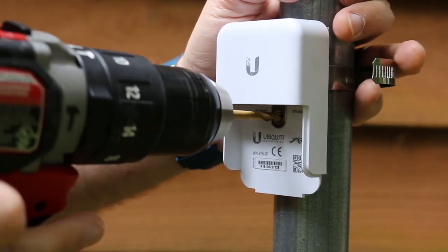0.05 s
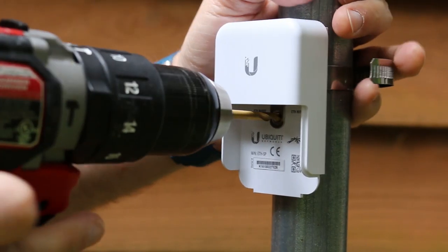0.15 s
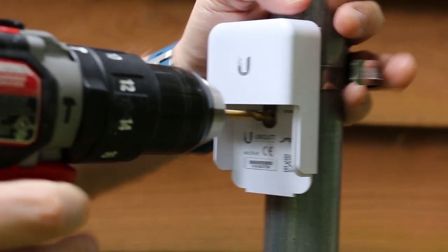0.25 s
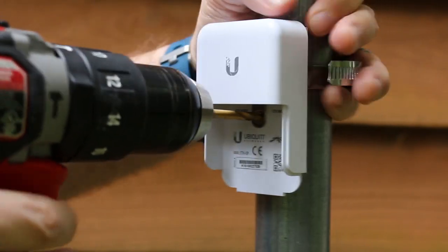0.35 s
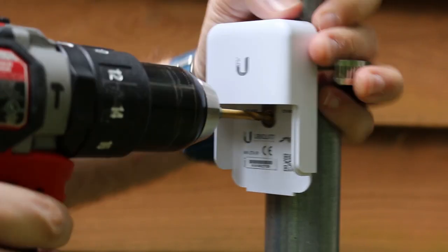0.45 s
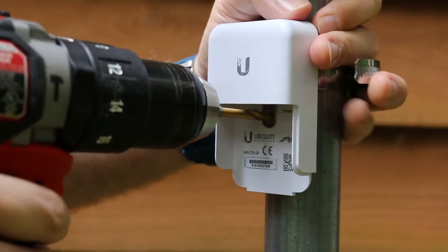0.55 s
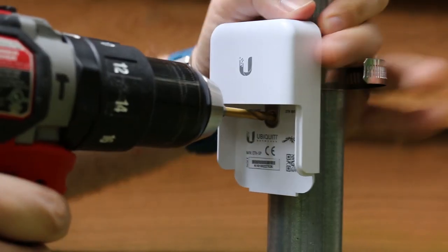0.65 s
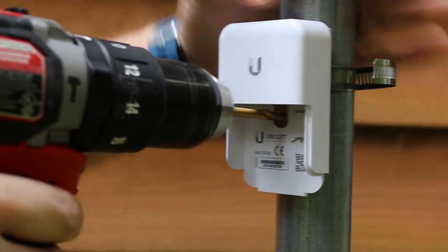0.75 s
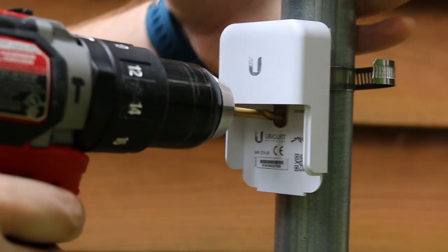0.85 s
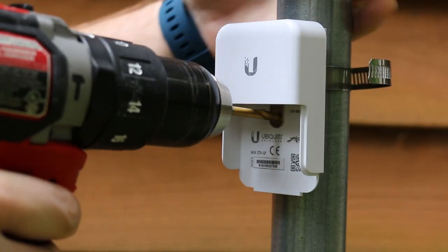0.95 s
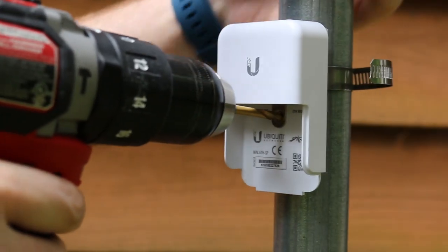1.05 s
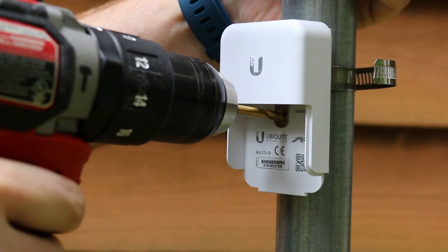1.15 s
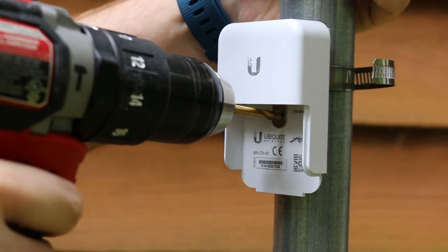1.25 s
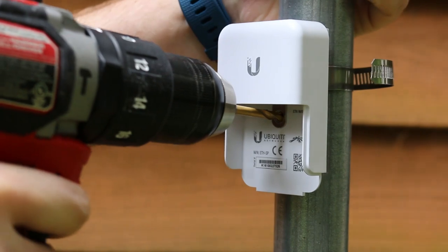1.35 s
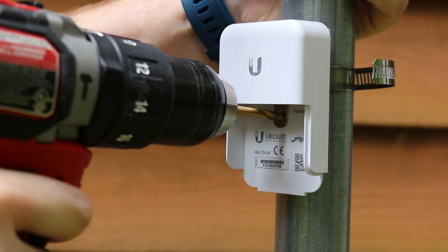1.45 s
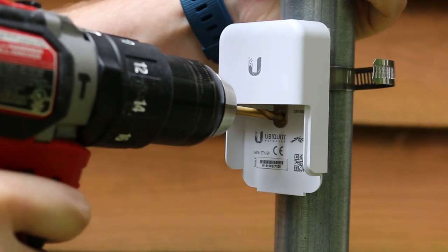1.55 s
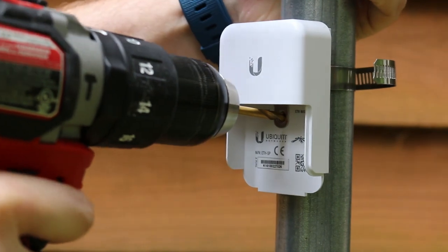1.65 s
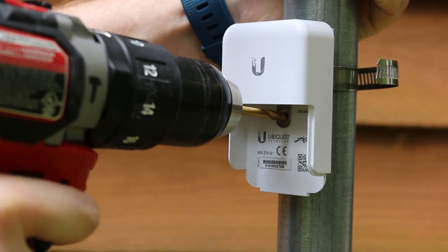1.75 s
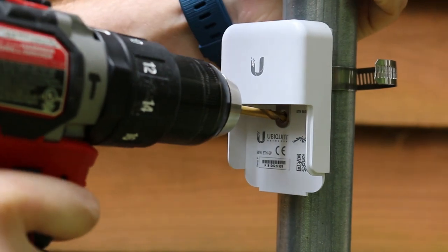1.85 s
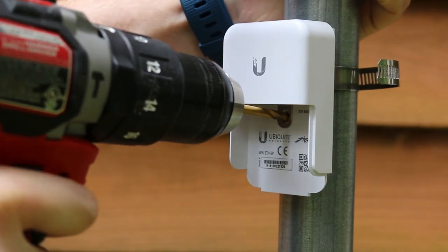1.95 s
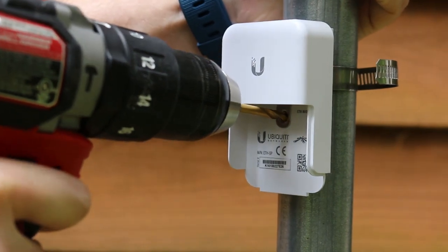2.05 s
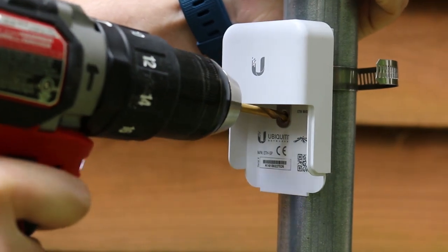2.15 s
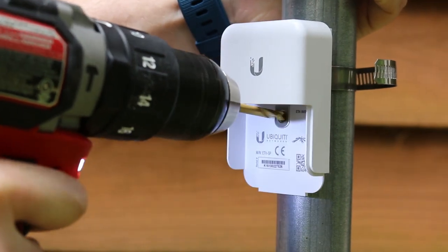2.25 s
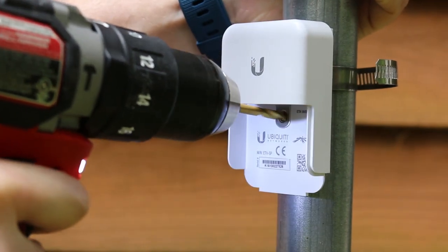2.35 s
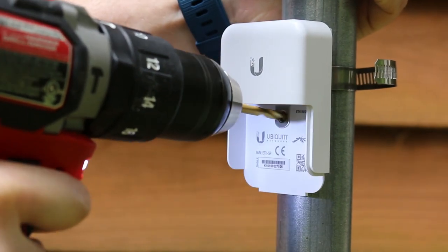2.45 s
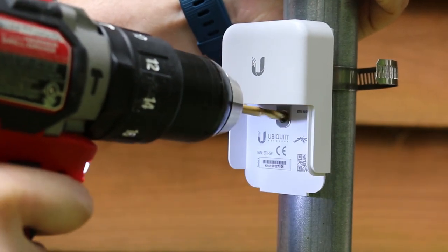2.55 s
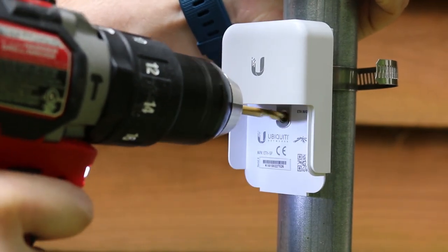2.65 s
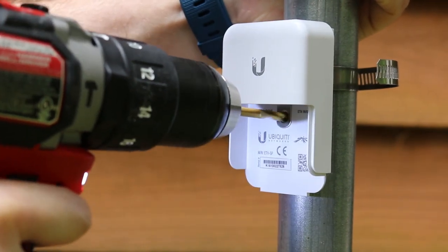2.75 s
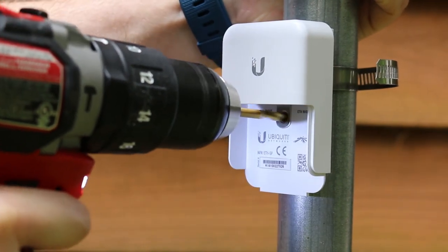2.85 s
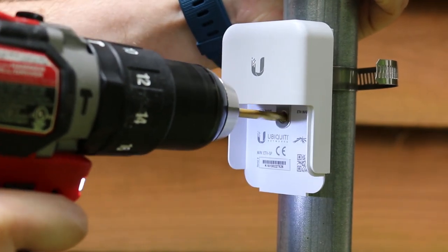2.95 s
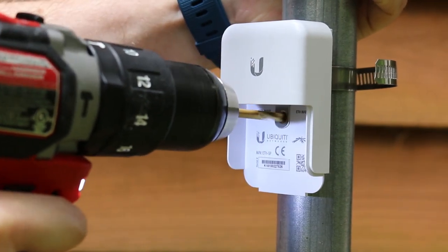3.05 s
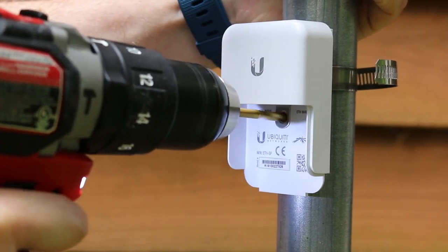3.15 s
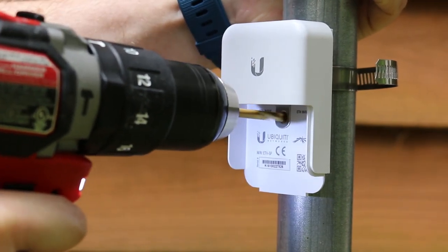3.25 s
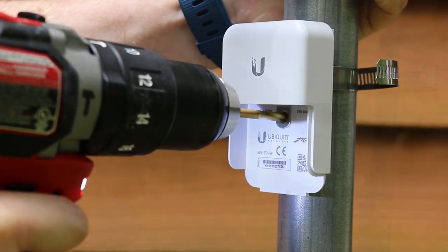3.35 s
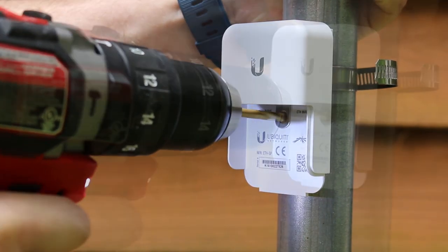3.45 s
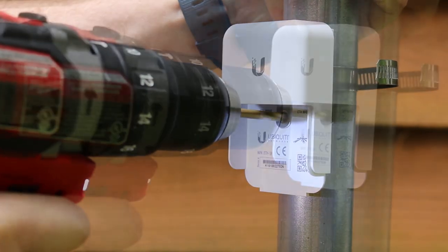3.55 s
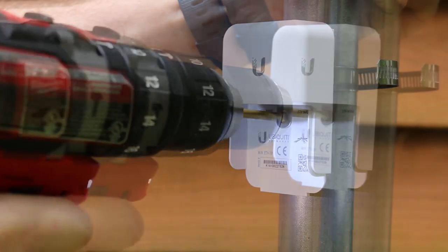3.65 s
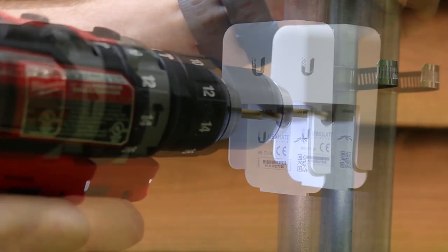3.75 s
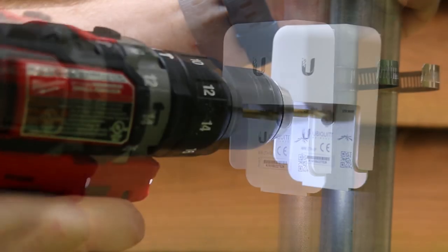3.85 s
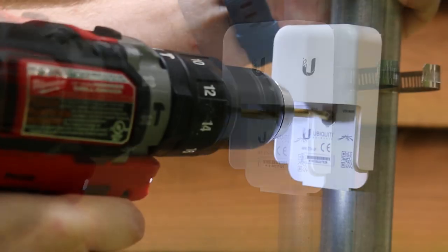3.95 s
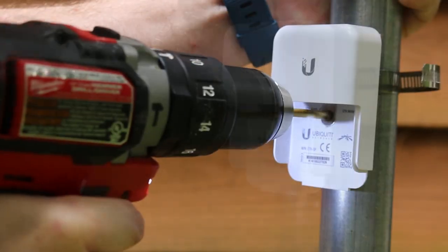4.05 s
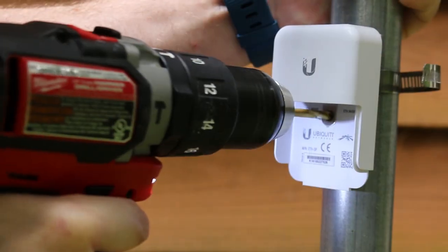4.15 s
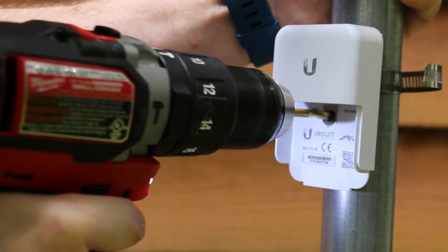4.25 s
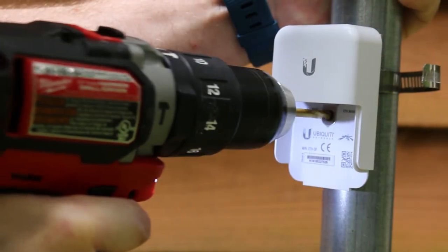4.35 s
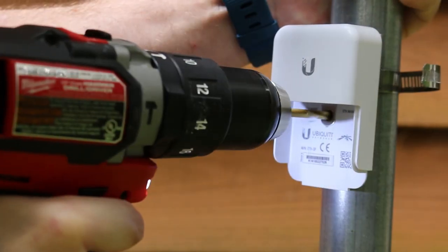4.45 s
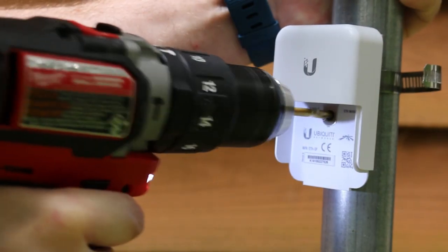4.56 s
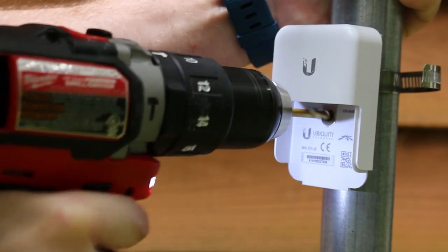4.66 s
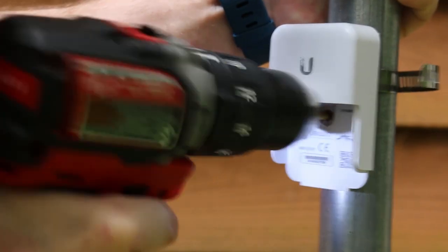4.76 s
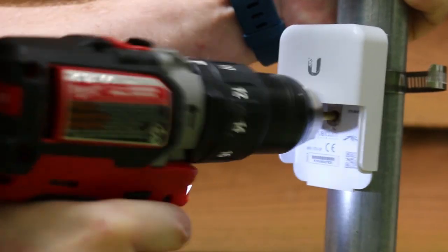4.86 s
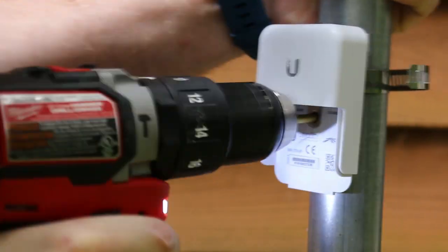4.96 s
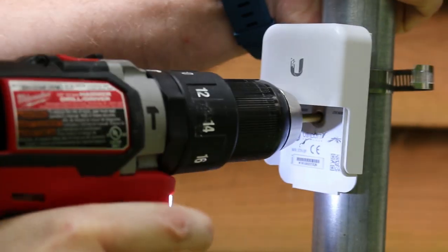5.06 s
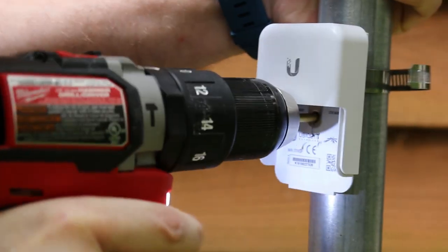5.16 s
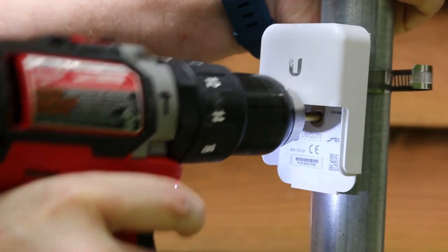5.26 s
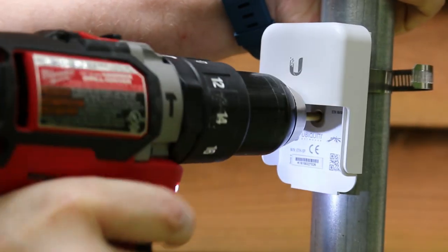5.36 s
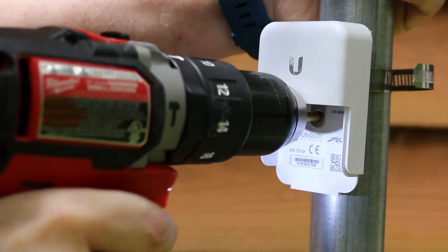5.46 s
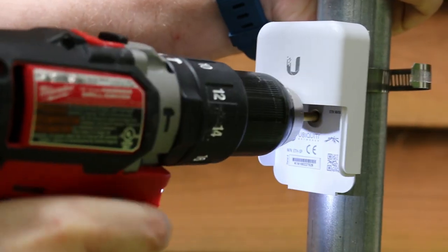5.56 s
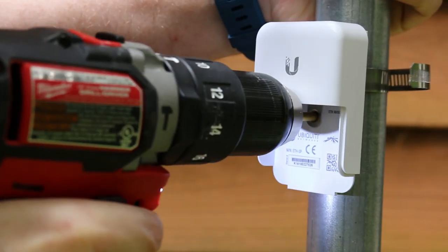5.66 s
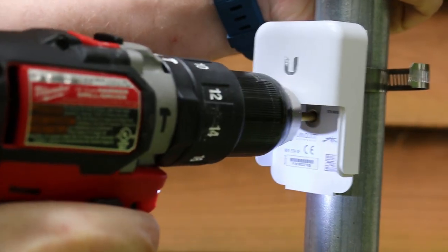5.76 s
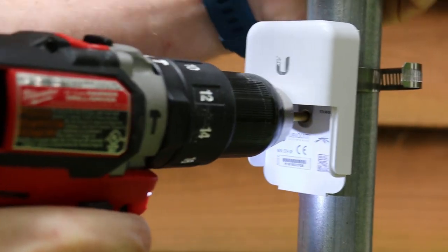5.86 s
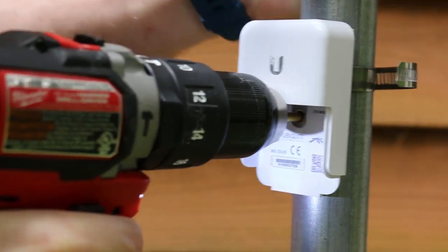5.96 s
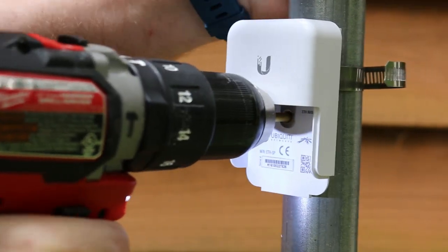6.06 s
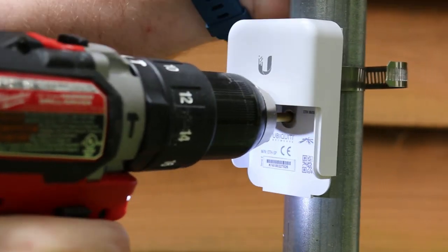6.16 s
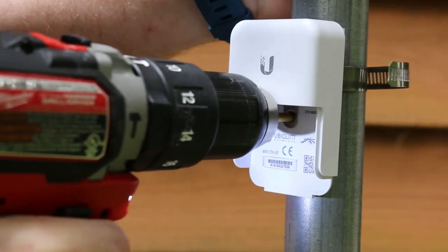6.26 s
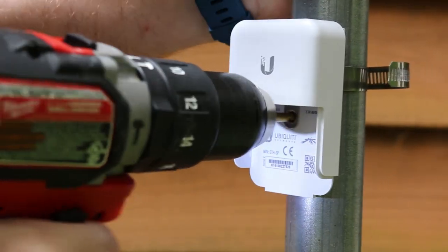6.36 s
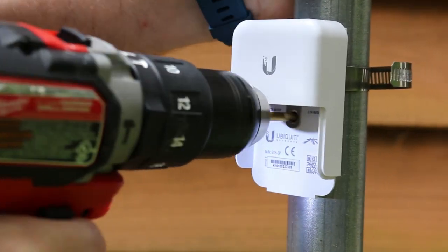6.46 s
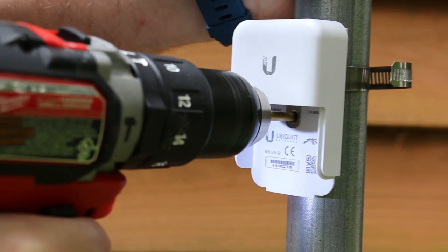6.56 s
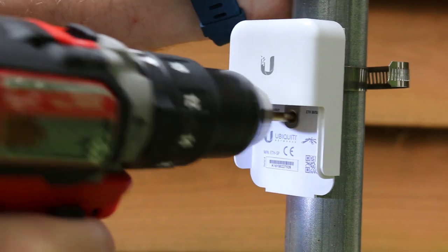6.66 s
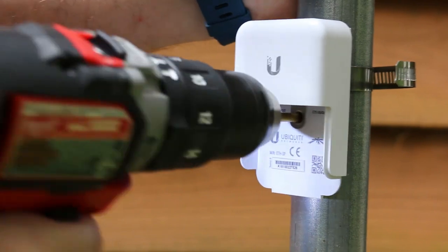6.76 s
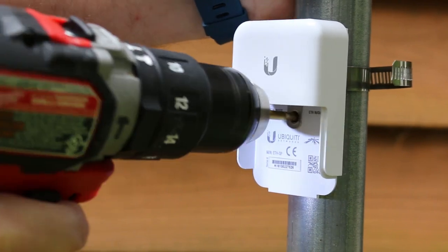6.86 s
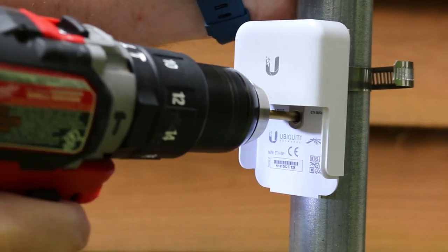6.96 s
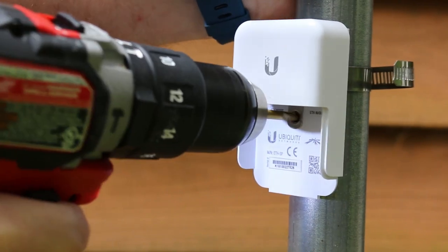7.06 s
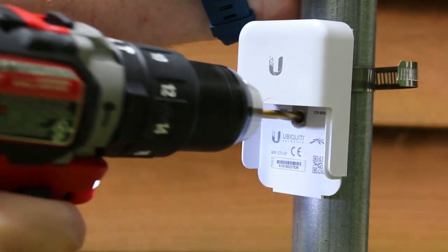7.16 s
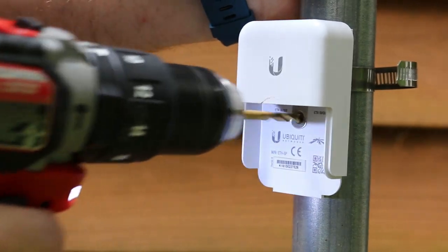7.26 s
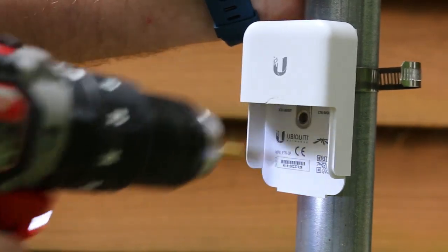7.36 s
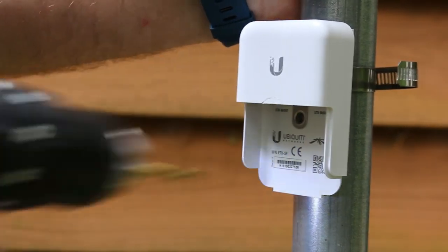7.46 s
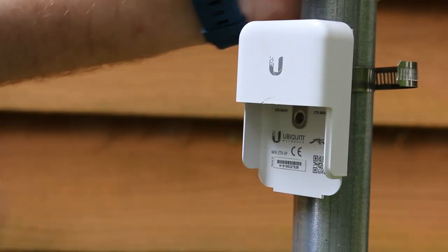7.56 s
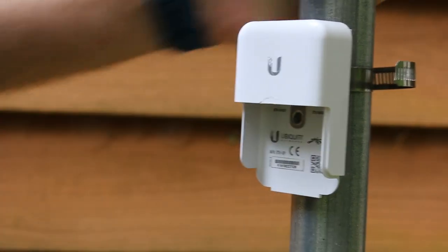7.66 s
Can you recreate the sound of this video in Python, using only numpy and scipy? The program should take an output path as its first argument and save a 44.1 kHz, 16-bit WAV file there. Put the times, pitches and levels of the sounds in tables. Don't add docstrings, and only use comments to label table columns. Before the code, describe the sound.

Outdoors, close and dry, over a faint low hum. From 0 to 0.6 s hands rub a steel pole with soft hiss, light taps and thin ringing; at about 0.87 s a hard, bright plastic snap hits, then rubbing fades into near quiet. At 2.3 s a trigger clicks and a cordless drill creeps up with chattering gears and a thin high whistle, surging near 2.8 s, dipping, then settling by 3 s into a loud steady whine with rasping steel and airy fan noise. From 3.8 s a low groan joins and pitch sags slightly. Around 4.75 s breakthrough brings clattering clicks and pole knocks; the motor brakes down by 5.1 s. Clicks at 5.25 and 5.4 s, a pole bump at 5.7 s and soft handling follow. At 6.37 s a click launches a quick second run, steady until 7.5 s, whining down by 7.6 s into a slight rub and quiet.

```python
import sys
import numpy as np
from scipy import signal
from scipy.io import wavfile
from scipy.ndimage import uniform_filter1d

SR = 44100
rng = np.random.default_rng(int(sys.argv[2]) if len(sys.argv) > 2 else 0)


def how_loud(loudness_db):
    steps = np.asarray(loudness_db, float) / 20
    return 10 ** steps


def transcribe(u):
    v = np.clip(np.atleast_2d(u).T, -1, 1)
    q = np.round(v * 32767).astype(np.int16)
    wavfile.write(sys.argv[1], SR, q)


N = 340452

# [f/Hz, level/dB per Hz]
HUM_COLOUR = [(20, -26), (100, -3), (130, -10), (500, -17), (1000, -30.5), (3000, -38), (9000, -59.5)]
# [t/s, pole ring/dB, housing ring/dB, skin hiss/dB, decay/dB per s]
HAND_STROKES = [(.01, -48, -64, -67, 36), (.15, -51.5, -71, -72, 30), (.33, -44, -56, -59.5, 90),
                (.42, -57, -66, -71, 108), (.57, -62, -71, -61.5, 301), (.83, -66, -73, -55.5, 81.5),
                (.9, -75, -48, -61, 53.5), (1.0, -72, -54, -60.5, 30), (1.19, -69, -56, -58.5, 38.5),
                (1.31, -73, -54.5, -63.5, 43), (1.55, -76, -63, -72.5, 48), (5.07, -58.5, -58.5, -68, 59),
                (5.2, -76, -64.5, -68.5, 19), (5.44, -80, -59, -67, 70), (5.62, -78, -62.5, -85, 25),
                (5.78, -66.5, -62, -86, 26.5), (6.1, -69.5, -67, -79.5, 13.5), (7.62, -66.5, -50, -65, 43)]
RESTING_DB = (-75, -86, -93)
# [f/Hz, level/dB, t60/s]
POLE_MODES = [(251, -29, 0.23), (355, 11, 0.16), (424, -23.5, 0.11), (1002, -2, 0.16), (1110, -2, 0.14),
              (1250, -29, 0.11)]
# [f/Hz, width/Hz, level/dB]
HOUSING_MODES = [(1420, 44, -3), (1980, 100, -6), (2460, 80, -6.5), (2580, 48, -6), (3037, 110, 0),
                 (3290, 150, -10.5), (3880, 75, -10.5)]
# [f/Hz, level/dB per Hz]
SKIN_COLOUR = [(3800, -10), (4700, -15), (5300, -13), (7000, -2), (8600, -16.5), (10200, -8.5),
               (15500, -17.5)]
# [t/s, level/dB, rise/dB per s, decay/dB per s]
PALM_SLIDES = [(.01, -55.5, 100, 18), (.32, -51.5, 150, 60), (.42, -67, 150, 70), (.56, -60, 209, 149),
               (1.0, -64, 151, 22), (5.08, -61, 200, 50), (5.3, -68, 100, 20), (5.46, -69, 200, 37),
               (5.77, -69, 200, 19)]
# [f/Hz, level/dB per Hz]
PALM_COLOUR = [(500, -4.5), (1150, -6), (1750, -10.5), (2450, -1.5), (3250, -7.5), (3700, -20)]
# [t/s, level/dB, rise/dB per s, decay/dB per s]
SONGS = [(0.2, -53, 2, 36.5), (.9, -64.5, 301, 32.5), (5.14, -66, 136.5, 22), (.33, -54.5, 420, 179.5),
         (0.94, -49, 246, 134), (1.2, -59.5, 90.5, 60), (0.94, -56, 301, 41), (5.9, -64, 83, 36),
         (8.4, -66, 105, 30), (6.14, -72.5, 58, 60), (5.79, -58.5, 396, 70), (5.78, -69.5, 398, 51),
         (0.31, -44.5, 397, 62.5)]
SONG_HZ = [2465, 2560, 2500, 4620, 7000, 3025, 1420, 2900, 2760, 2070, 368, 1070, 366]
# [t/s, peak/dB, contact/ms, tilt/dB per octave, touched spot f/Hz]
SNAP_EVENTS = [
    (.2503, -42.5, 1.9, -6, 9800),
    (.334, -30.5, 3, 9, 8400),
    (.4035, -41.5, 2.2, -2.5, 3400),
    (.5504, -41, 4, 0.5, 7470),
    (.8657, 0.5, 0.09, 0.5, 6800),
    (.8683, .5, 0.14, -3.5, 7150),
    (.9421, -19.5, 12, -4.5, 3070),
    (2.0292, -66, 5.4, -5, 3280),
    (2.06, -53.5, 2.8, 4, 4200),
]
# [f/Hz, level/dB, t60/s]
CLIP_MODES = [(1420, -9.5, 0.084), (1810, -15, 0.049), (2670, -16, 0.09), (3044, -10.5, 0.038),
              (3200, -1.5, 0.032), (4200, -12.5, 0.027), (5720, -22, 0.028), (7000, -8, 0.041),
              (8220, -13.5, 0.031), (10550, -13, 0.025)]
# [t/s, peak/dB, contact/ms, tilt/dB per octave, touched spot f/Hz]
KNOCK_EVENTS = [(.305, -40.5, 15, -10, 362), (.334, -23.5, 4, -2, 357), (.545, -45, 8.5, -8, 730),
                (4.725, -39.5, 8.1, -7, 350), (4.762, -24.5, 5, -6, 350), (4.775, -20.5, 2.4, 1, 522),
                (4.798, -34, 6, -8, 345), (4.832, -29, 5.9, -8, 342), (4.965, -36.5, 15, -8, 370),
                (5.698, -36, 14, 0, 375), (5.72, -18.5, 6.8, 3, 369.4)]
# [t/s, peak/dB, contact/ms, tilt/dB per octave, touched spot f/Hz]
CLICK_EVENTS = [(2.2768, -22, 1.5, -2.5, 3800), (4.7743, -7.5, 1.5, -5, 3165), (4.783, -6, 2.7, -3.5, 2362),
                (4.801, -11, 1.9, -4, 4360), (4.834, -11.5, 2.5, -7, 2984), (5.251, -13.5, 1.4, -3, 3550),
                (5.343, -38.5, 5.4, -4.5, 3200), (5.377, -32, 3.8, -2, 2700),
                (5.4046, -18, 1.3, -8.5, 3320), (5.4243, -10.5, 0.3, -2.5, 4440),
                (5.519, -47.5, 1.3, -4.5, 8040), (5.724, -28, 11, -12.5, 2190),
                (6.3135, -46.5, 4.5, 6, 8350), (6.3678, -6, 1.5, -6.5, 7940)]
# [f/Hz, level/dB, t60/s]
LID_MODES = [(1390, -16, 0.021), (1860, -15, 0.028), (2700, -14, 0.037), (3400, 2, 0.013),
             (4660, -6, 0.019), (6276, -3.5, 0.0036), (9150, -1.5, 0.0076), (13300, -6, 0.0074)]
# [start t/s, stop t/s]
RUNS = [
    (2.274, 5.078),
    (6.3665, 7.618),
]
# [t/s, goal f/Hz, lag/s]
PULLS = [(2.268, 298, .206), (2.321, 640, .2), (2.382, 253.6, .02), (2.42, 270.5, .08), (2.84, 510, .208),
         (2.93, 374.4, .021), (2.98, 434.6, .033), (3.79, 428.5, .02), (3.85, 420.9, .8), (4.6, 397.8, .3),
         (4.77, 422.9, .03), (4.937, 300, .153), (4.983, -3000, 1.0), (5.005, -3000, .88), (6.357, 400, .1),
         (6.378, 2000, .3), (6.417, 447.5, .032), (6.7, 427.4, .051), (6.77, 442.7, .1), (7.16, 450.7, .1),
         (7.445, 300, .3), (7.495, -3000, 1.7), (7.522, -3000, 1.15), (7.57, -3000, .85)]
# [start t/s, end t/s, fade/s, upper whistle/dB, lower whistle/dB]
CHOPPING = [
    (2.263, 2.84, 0.24, -22.5, -33),
    (6.353, 6.392, 0.014, -22.5, -43),
]
# [t/s, load/dB]
GEAR_LOAD = [(2.44, -3.5), (2.7, 3.5), (3.1, -0.5), (3.8, -0.5), (4.4, -2.5), (4.76, -4), (4.82, -12),
             (4.93, -12.5), (4.99, 1), (5.02, -12), (6.405, -9), (6.44, -1.5), (6.47, 4), (6.7, -1.5),
             (7.0, 2), (7.44, 1), (7.52, 4.5), (7.55, -12)]
# [f/Hz, level/dB]
MAGNET_PATH = [(900, -66.5), (1500, -29), (2150, -39.5), (2600, -23), (2950, -15), (3200, -20.5),
               (3320, -30.5), (3500, -24)]
# [f/Hz, level/dB]
GEAR_PATH = [(1500, -60.5), (2500, -30), (3150, -18), (3500, -21.5), (3900, -17.5), (4600, -34),
             (5400, -24.5), (5750, -25)]
# [start t/s, end t/s, level/dB]
BINDING = [
    (4.5, 4.79, 8.5),
]
ORDERS = [4, 7, 12, 14, 16, 20, 24, 26, 32]
# [level/dB, rise under torque/dB, change when braking/dB]
ORDER_LEVELS = [(-21.5, -3.5, 4), (-59.5, -3, -5.2), (-39, 3.5, 2), (-52, -1.5, 3), (-35, 9, -11),
                (-36, 4, 1), (-45.5, 9.5, -7), (-42.5, 8.5, -8), (-55, 17, -7.5)]
# [f/Hz, level/dB]
CASING_PATH = [(300, -88.5), (650, -16.5), (1070, -8.5), (1750, -19), (2300, -13.5), (2700, 6.5),
               (3200, 13.5), (3800, 4.5), (4500, -2.5), (5500, -2.5), (7000, -5), (9000, -8), (11500, 0.5)]
# [f/Hz, level/dB per Hz]
RASP_COLOUR = [(210, -73.5), (350, -33), (417, -56), (477, -41), (708, -33), (831, -12.5), (960, -11.5),
               (1250, 6.5), (2220, -12.5), (2600, -10), (3380, -25), (5720, -120)]
# [f/Hz, level/dB per Hz]
RATTLE_COLOUR = [(1700, -15), (2200, -10), (2600, -5), (3000, -2.5), (3700, -1), (4300, -6), (5000, -12.5),
                 (6000, -23.5)]
# [f/Hz, level/dB per Hz]
AIR_COLOUR = [(4300, -27), (5200, -0.5), (6100, -3.5), (6900, 3), (7600, -1), (8500, 0.5), (9500, -3.5),
              (10400, -5), (12000, -9.5), (15500, -17)]
# [start t/s, end t/s, level/dB]
SKIMMING = [
    (2.4, 3.8, -35),
    (6.4, 7.55, -37),
]
# [start t/s, end t/s, level/dB]
WOBBLES = [
    (2.91, 3.04, -46.5),
    (3.07, 3.82, -47.5),
    (6.66, 6.91, -62),
]
# [start t/s, end t/s, level/dB]
BITING = [
    (3.79, 5.07, -43),
    (6.4, 7.61, -67),
]
# [f/Hz, width/Hz, level/dB]
GROAN_MODES = [(491.4, 40, -5.5), (604, 28, -5), (676, 87, -1), (850, 180, .5)]
# [start t/s, end t/s, level/dB]
SHUDDERING = [
    (4.765, 4.88, -38.5),
]
# [t/s, level/dB, rise/dB per s, decay/dB per s]
BREAKTHROUGH = [
    (4.8, -39.5, 398, 42),
]
# [f/Hz, width/Hz, level/dB]
SHAKE_MODES = [(350, 28, -2.5), (501, 57, 3.5)]
# [f/Hz, level/dB]
SMEAR_COLOUR = [(300, -41.5), (900, -39.5), (1300, -8), (4000, -16.5), (15000, -14.5)]
# [f/Hz, level/dB]
SIDE_COLOUR = [(300, -50), (2500, -48), (4000, -37), (5600, -25), (8000, -21.5), (15000, -18)]


def evened(x):
    return x / np.sqrt(np.mean(x ** 2) + 1e-20)


def read(points, hz):
    f, value = np.transpose(points)
    return np.interp(np.log(hz + 1), np.log(f + 1), value)


def add(mix, s, sound):
    part = mix[round(s * SR):][:len(sound)]
    part += sound[:len(part)]


def wander(per_s):
    span = max(round(SR / per_s), 2)
    once = uniform_filter1d(rng.standard_normal(N), span)
    return evened(uniform_filter1d(once, span))


def noise(shape_db, patchy_db, size=512):
    hz = np.fft.rfftfreq(size, 1 / SR)
    a, b, patches = rng.standard_normal((N * 4 // size + 5, len(hz), 3)).T
    patches = uniform_filter1d(patches, size=size // 128, axis=0)
    patches = evened(uniform_filter1d(patches, size=8, axis=1))
    z = (a + 1j * b) * how_loud(shape_db(hz)[:, None] + patchy_db * patches)
    return evened(signal.istft(z, nperseg=size, noverlap=size * 3 // 4)[1][:N])


def table(points):
    low, high = points[0][0], points[-1][0]
    return lambda hz: read(points, hz) - 60 * ((hz < low) | (hz > high))


def humps(peaks, sharpness=1):
    def shape_db(hz):
        power = sum(how_loud(2 * db) / (1 + (2 * (hz - f) / w) ** 2) for f, w, db in peaks)
        return sharpness * 10 * np.log10(power)
    return shape_db


def tone(turns, level_db, shimmer_db):
    level = np.sqrt(2) * how_loud(level_db + shimmer_db * wander(per_s=51))
    return level * np.cos(2 * np.pi * (turns + rng.random()))


def held(spans, rise_s, fall_s, depth_db=40):
    t = np.arange(N) / SR
    levels = []
    for a, b, db in spans:
        opening = np.minimum((t - a) / rise_s, (b - t) / fall_s)
        levels.append(db - depth_db * (1 - np.minimum(opening, 1)))
    return np.maximum(np.max(levels, axis=0), -140)


def stroke(s, db, rise, decay):
    t = np.arange(N) / SR - s
    return db + np.minimum(rise * t, -decay * t)


def smeared(x, shape):
    hz, _, z = signal.stft(x, SR, nperseg=3072, noverlap=2048)
    coarse = np.sqrt(abs(uniform_filter1d(abs(z) ** 2, size=24, axis=0)))
    z = coarse * np.exp(2j * np.pi * rng.random(z.shape)) * how_loud(read(shape, hz))[:, None]
    return signal.istft(z, SR, nperseg=3072, noverlap=2048)[1][:N]


def hum():
    hold_s, recover_s, fall_s = 0.51, 1.05, 0.23
    t = np.arange(N) / SR
    ducks = []
    for a, b in RUNS:
        recovery = np.clip(1 - (t - b - hold_s) / recover_s, 0, 1)
        ducks.append(np.clip((t - a) / fall_s, 0, 1) * recovery)
    level_db = -63.5 - 13.5 * np.max(ducks, axis=0)
    return noise(table(HUM_COLOUR), patchy_db=1.5, size=2048) * how_loud(level_db)


def rubbing():
    pole_peaks = [(f, 20, db) for f, db, _ in POLE_MODES]
    pole_peaks += [(670, 25, 3.5), (820, 20, -2.5), (1160, 46, -7.5)]
    pole = noise(humps(pole_peaks), patchy_db=7.0, size=2048)
    housing = noise(humps(HOUSING_MODES, 1.35), patchy_db=3, size=2048)
    skin = noise(table(SKIN_COLOUR), patchy_db=4.5, size=1024)
    out = np.zeros(N)
    for k, layer in enumerate((pole, housing, skin)):
        touches = [stroke(row[0], row[k + 1], 201.5, row[-1]) for row in HAND_STROKES]
        out += layer * how_loud(np.maximum(np.max(touches, axis=0), RESTING_DB[k]))
    return out


def palm():
    level_db = np.max([stroke(*row) for row in PALM_SLIDES], axis=0)
    return noise(table(PALM_COLOUR), patchy_db=2.0, size=1024) * how_loud(level_db)


def singing():
    waver = wander(per_s=730)
    out = np.zeros(N)
    for hz, row in zip(SONG_HZ, SONGS):
        pitch = hz * (1 + 0.012 * (hz / 7000) ** 2 * waver)
        out += tone(np.cumsum(pitch) / SR, stroke(*row), 3.9)
    return out


def blows(events, modes, crack_db, low_hz, scatter, ring, spot_db, spot_t60, tail_db):
    out, t = np.zeros(N), np.arange(SR // 2) / SR
    luck = rng.standard_normal((len(events), 3000 + len(modes) + 1))
    band = signal.butter(2, [1200, 5200], "band", fs=SR, output="sos")
    tail = signal.sosfilt(band, rng.standard_normal(len(t))) * how_loud(-60 * t / 0.11)
    thin = signal.butter(6, low_hz, "high", fs=SR, output="sos")
    for (s, db, contact_ms, tilt_db, spot_hz), row in zip(events, luck):
        u = t[:3000] / (max(contact_ms, .05) / 1000)
        push = row[:3000] * np.sqrt(u) * np.exp(-u)
        push[0] = 4.5 * np.exp(-contact_ms)
        grip = 1 + scatter * row[3000:]
        body = np.zeros(len(t))
        for (f, mode_db, t60), g in zip(modes + [(spot_hz, spot_db, spot_t60)], grip):
            decay_db = 60 * t / (t60 * max(ring, .1))
            level = how_loud(mode_db + tilt_db * np.log2(f / 3000) - decay_db)
            body += level * np.sin(2 * np.pi * f * g * t)
        body += how_loud(tail_db + 10) * abs(body).max() * tail
        body[0] = how_loud(crack_db + 2 * tilt_db) * abs(body).max()
        sound = signal.sosfilt(thin, signal.fftconvolve(push, body))
        add(out, s - .0005, how_loud(db) * sound / abs(sound).max())
    return out


def snaps():
    return blows(SNAP_EVENTS, CLIP_MODES, 3.3, 1400, 0.0033, ring=.7,
                 spot_db=5, spot_t60=.025, tail_db=-35)


def knocks():
    return blows(KNOCK_EVENTS, POLE_MODES, -33, 251, 0.0015, ring=1.0,
                 spot_db=6, spot_t60=0.16, tail_db=-71.5)


def shaft():
    rotor_s = .015
    t, speed, now = np.arange(N) / SR, np.zeros(N), 0
    ends = [row[0] for row in PULLS[1:]] + [N / SR]
    for (s, goal, lag), end in zip(PULLS, ends):
        part = slice(round(s * SR), round(end * SR) + 1)
        speed[part] = np.maximum(goal + (now - goal) * np.exp((s - t[part]) / lag), 0)
        now = speed[part][-1]
    return uniform_filter1d(speed, size=round(rotor_s * SR)) + 1


def running():
    return held([(a, b, 0) for a, b in RUNS], rise_s=0.0045, fall_s=0.023, depth_db=22.5)


def braking(speed):
    return np.clip(-uniform_filter1d(np.gradient(speed), size=400) * SR / 3000, 0, 1)


def whistle(turns):
    chop_hz, start_s = 9800, .014
    t = np.arange(N) / SR
    a, b, fade, up, low = CHOPPING[0]
    sag_db = 11.5 * np.tanh(np.maximum(t - a, 0) / .25) ** 2
    upper_db = held([(a, b + fade, up)], start_s, fade) - sag_db
    lower_db = held([(a, b + fade, low)], start_s, fade, depth_db=31.5)
    a, b, fade, up, low = CHOPPING[1]
    upper_db = np.maximum(upper_db, held([(a, b + fade, up)], start_s, fade))
    lower_db = np.maximum(lower_db, held([(a, b, low)], start_s, fade))
    carrier, poles = chop_hz * t, 4 * turns
    out = tone(carrier + poles, upper_db, 1.2)
    out += tone(carrier - poles, lower_db, 0.4)
    return out + tone(carrier + 2 * poles, upper_db - 15.5, 1.2)


def whines(turns, speed):
    magnet, gear = 8, 13
    brake = braking(speed)
    load_db = running() + np.interp(np.arange(N) / SR, *np.transpose(GEAR_LOAD))
    strain_db = np.maximum(held(BINDING, 0.18, .01, depth_db=15), 0) + 3.5 * brake
    magnet_db = read(MAGNET_PATH, magnet * speed) + load_db + strain_db + 1.1 * wander(per_s=3.3)
    gear_db = read(GEAR_PATH, gear * speed) + load_db - 12 * brake + 2.3 * wander(per_s=4.5)
    return tone(magnet * turns, magnet_db, 0.84) + tone(gear * turns, gear_db, 1.4)


def weak_orders(turns, hz, speed):
    pull = abs(uniform_filter1d(np.gradient(speed), size=800)) * SR
    torque, brake, running_db = np.minimum(pull / 2500, 1), braking(speed), running()
    out = np.zeros(N)
    for k, (db, pull_db, brake_db) in zip(ORDERS, ORDER_LEVELS):
        level_db = db + pull_db * torque + brake_db * brake
        out += tone(k * turns, level_db + running_db + read(CASING_PATH, k * hz), 0.94)
    return out


def rasp(halvings, planet, noise_db):
    first = noise(table(RASP_COLOUR), patchy_db=1.5)
    second = noise(lambda hz: table(RASP_COLOUR)(1.117 * hz), patchy_db=0.0)
    scrape = np.where(np.arange(N) > 6 * SR, second, first)
    return scrape * how_loud(-26.5 - 5.5 * halvings + noise_db + 0.55 * wander(per_s=60) + .4 * planet)


def rattle(turns, speed, halvings, planet, grit, noise_db):
    slow = np.clip((215 - speed) / 50, 0, 1)
    slack_db = slow * np.where(np.gradient(speed) > 0, 10, -1.5)
    slack_db -= 8.5 * np.clip(1 - speed / 42, 0, 1)
    chatter = noise(humps([(2800, 560, 0)], 2), patchy_db=5)
    chatter *= how_loud(1.1 * grit + 3 * np.cos(8 * np.pi * turns))
    teeth = np.sqrt(1 - 0.83 * slow) * noise(table(RATTLE_COLOUR), patchy_db=1.5)
    level_db = -23.5 - 2.5 * np.minimum(halvings, 1.5) + slack_db + noise_db
    return (teeth + 0.84 * slow * chatter) * how_loud(level_db + 0.5 * grit + 1.0 * planet)


def fan_air(speed, halvings, planet, grit, noise_db):
    level_db = -28.5 - 3.5 * halvings + noise_db - 7 * braking(speed)
    beat_db = 1.1 * planet + 2.2 * (2 * planet ** 2 - 1)
    return noise(table(AIR_COLOUR), patchy_db=1.55) * how_loud(level_db + beat_db + 0.45 * grit)


def clicks():
    return blows(CLICK_EVENTS, LID_MODES, 13, 1400, 0.055, ring=0.83,
                 spot_db=-5, spot_t60=.015, tail_db=-32)


def skim():
    colour = [(760, -25.5), (880, -6.0), (1050, 4.0), (1200, -6)]  # f/Hz, level/dB per Hz
    return noise(table(colour), patchy_db=1.5) * how_loud(held(SKIMMING, 0.046, 0.024, depth_db=18))


def wobble(turns):
    first = tone(turns, held(WOBBLES, 0.087, 0.047, depth_db=21.5), 1.1)
    return first + tone(4 * turns, held(WOBBLES, .06, 0.034, depth_db=26) + 11.5, 1.1)


def groan():
    level_db = held(BITING, 0.018, 0.015, depth_db=13.5)
    return noise(humps(GROAN_MODES, 3), patchy_db=4.5, size=2048) * how_loud(level_db)


def shudder(turns):
    return tone(turns / 2, held(SHUDDERING, .01, 0.022, depth_db=20.5), 1.8)


def shake():
    level_db = stroke(*BREAKTHROUGH[0]) + running()
    return noise(humps(SHAKE_MODES, 2), patchy_db=5.5, size=1024) * how_loud(level_db)


def drill():
    speed = shaft()
    hz = speed * (1 + 0.00073 * wander(per_s=120))
    turns = np.cumsum(hz) / SR
    planet = np.cos(2 * np.pi * turns * 4 / 9)
    grit = wander(per_s=400)
    halvings = np.log2(430 / np.maximum(speed, 45))
    noise_db = running() - 0.5 * braking(speed)
    out = whistle(turns) + whines(turns, speed) + weak_orders(turns, hz, speed)
    out += rasp(halvings, planet, noise_db)
    out += rattle(turns, speed, halvings, planet, grit, noise_db)
    out += fan_air(speed, halvings, planet, grit, noise_db)
    out += skim() + wobble(turns) + groan() + shudder(turns) + shake()
    return signal.sosfilt(signal.butter(4, 300, "high", fs=SR, output="sos"), out)


def scene():
    hands = rubbing() + palm() + singing()
    contacts = snaps() + knocks() + clicks()
    return np.tile(hum() + hands + contacts + drill(), (2, 1))


def top_cut(x):
    return signal.sosfilt(signal.butter(12, 16520, fs=SR, output="sos"), x)


def record(dry):
    mid = np.clip(dry[0], -1, 1)
    side = smeared(mid, SIDE_COLOUR)
    mix = mid + smeared(mid, SMEAR_COLOUR) + np.array([side, -side])
    return top_cut(mix)


dry = scene()
out = record(dry)
transcribe(out)
```